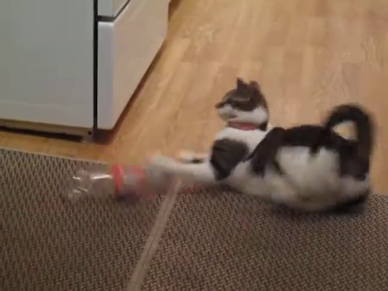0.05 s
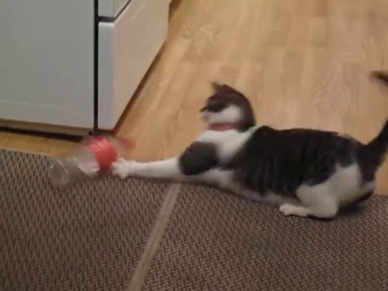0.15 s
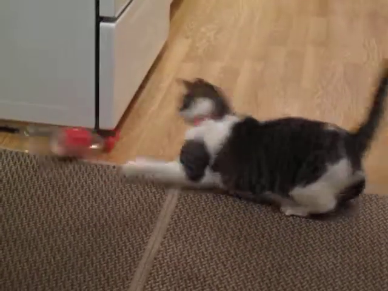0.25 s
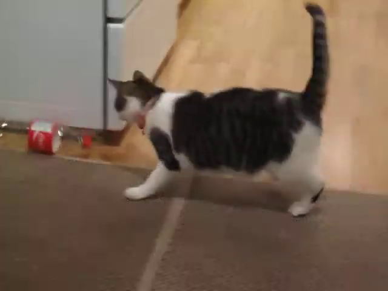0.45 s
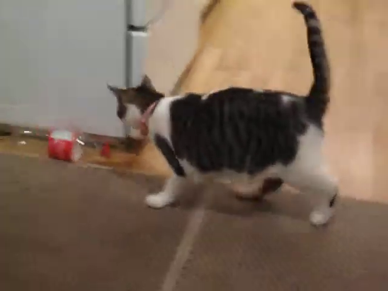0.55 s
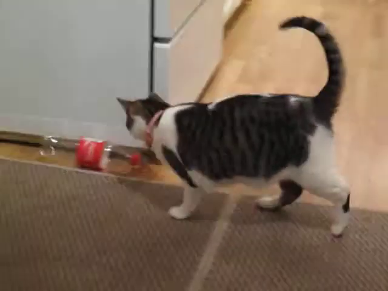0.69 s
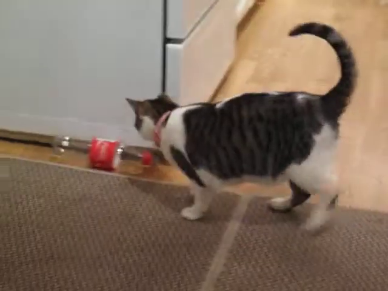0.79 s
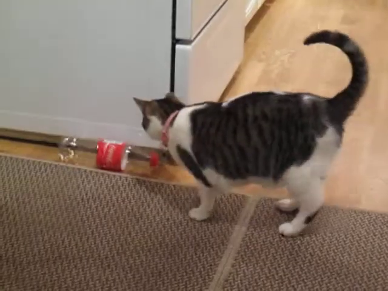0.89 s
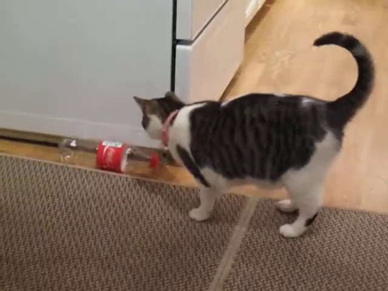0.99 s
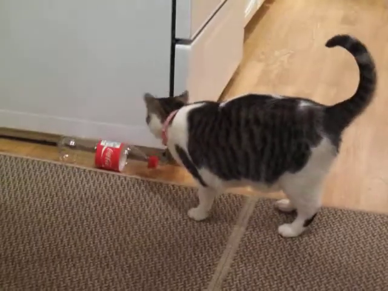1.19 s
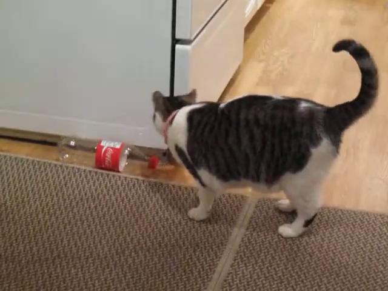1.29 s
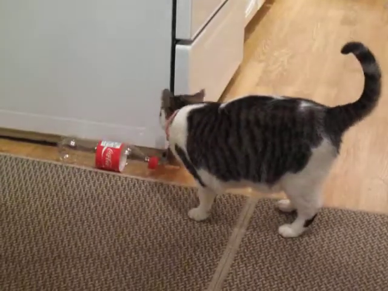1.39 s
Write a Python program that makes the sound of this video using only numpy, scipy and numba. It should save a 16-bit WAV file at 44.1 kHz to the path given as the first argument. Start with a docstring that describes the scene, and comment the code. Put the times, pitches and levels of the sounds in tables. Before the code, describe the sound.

Hollow plastic bottle knocks hard once, skitters and rattles to rest in a small echoing kitchen.

```python
"""Plastic bottle swatted across a kitchen

A cat swats an empty plastic bottle off a rug; it cracks against the fridge, clatters on the hard floor and settles.
Each contact is a noise crackle of the thin wall plus decaying sines for the hollow ring of wall and inner air.
Paws thud as soft noise bursts with booming modes; rubbing gives grainy scuffs and thin wobbling squeaks.
A dense noise tail makes the kitchen reverberate, over the rush, hum and whine of a fridge.
The loudest knock overloads the recorder, whose gain control ducks and then swells the echo back up.
"""
import sys
import numpy as np
from scipy import signal
from scipy.fft import rfft, irfft
from scipy.io import wavfile
from scipy.ndimage import uniform_filter1d
from numba import njit

SR = 44100
rng = np.random.default_rng(int(sys.argv[2]) if len(sys.argv) > 2 else 0)


def put_to_file(sound):
    """Save the sound as 16-bit audio at rate SR, in the file named by the first command-line argument."""
    columns = np.atleast_2d(sound).T  # one column per channel
    safe = np.clip(columns, -1, 1)
    whole_steps = np.round(safe * 32767)
    wavfile.write(sys.argv[1], SR, whole_steps.astype(np.int16))


N = 63945  # length in samples

# Fridge rush, relative spectrum: f/Hz, level/dB
FRIDGE_RUSH_COLOUR = [(15, -52), (25, -20), (108, -5), (145, -12), (185, -2.5), (270, -6), (309, -3.5),
                      (344, -8), (677, -11), (887, -10.5), (1260, -11.5), (1610, -18), (2840, -21),
                      (12200, -33), (16000, -43)]
FRIDGE_RUSH_DB = -50.5  # rms
# Steady fridge tones: f/Hz, rms level/dB
FRIDGE_TONES = [(120, -64), (194, -93), (243, -63), (1529, -68.5), (11770, -79)]
# Narrow noisy fridge whines: f/Hz, width/Hz, rms level/dB
FRIDGE_WHINES = [(2940, 27, -68), (5879, 120, -72), (11780, 120, -82)]

# Kitchen reverberation: f/Hz, t60/s
ROOM_DECAY = [(120, 0.49), (500, 0.51), (1100, 0.4), (3000, 0.43), (7000, 0.42), (14000, 0.41)]
ROOM_DB = 0.5  # tail energy against the direct sound
ROOM_GAP_S, ROOM_BUILD_S = 0.0011, 0.0015

# Scuffs on rug and floor: start t/s, length/s, level/dB
SCUFFS = [(-.04, .13, -43), (0.076, 0.062, -34.5), (0.408, 0.037, -45), (0.622, 0.076, -46)]
# Relative spectrum of a scuff: f/Hz, level/dB
SCUFF_COLOUR = [(100, -7), (350, -10), (700, -1), (1100, -12), (2000, -12), (3800, -5.5), (6000, -8),
                (9000, -28), (16000, -50)]
SCUFF_ROUGH = 0.17
# Thin squeaks of rubbed plastic: start t/s, length/s, f/Hz, peak level/dB
PLASTIC_SQUEAKS = [(0.093, 0.018, 5530, -42), (.141, 0.021, 5490, -34.5), (.498, 0.0026, 4140, -23.5),
                   (.794, 0.0026, 6480, -30)]
SQUEAK_WOBBLE = 0.0073  # rms share of the pitch
# The bottle skitters over the floor after the big knock; tilt in dB/octave
SKITTER_S, SKITTER_LENGTH_S = 0.24, 0.13
SKITTER_DB, SKITTER_TILT_DB, SKITTER_ROUGH = -22, 0.6, 0.68

# Soft thuds of the cat landing on the floor: t/s, level/dB, tilt/(dB/octave)
PAW_THUDS = [(.016, -37.5, -5.5), (.356, -31.5, -6), (.380, -21.5, 6), (.418, -23.5, 1), (.468, -27, -1.5),
             (.535, -29.5, -3.5), (.615, -34, -0.5)]
# Relative spectrum of a paw blow: f/Hz, level/dB
PAW_COLOUR = [(40, -52), (70, -20), (110, -3.5), (300, 3.5), (450, -10.5), (750, -7), (1500, -9),
              (5000, -69)]
# Floor modes before each blow's level and tilt: f/Hz, level/dB, t60/s
FLOOR_RINGS = [(125.6, -17, 0.91), (226, -19.5, 0.88), (249, -11, 0.3), (428, -12, 0.078),
               (563.7, -12, 0.14)]
# Dull bumps of the bottle against the fridge: t/s, level/dB, tilt/(dB/octave)
FRIDGE_BUMPS = [(.717, -26, 2), (.748, -28.5, 1.5), (.803, -36, -6)]
# Relative spectrum of a fridge bump: f/Hz, level/dB
FRIDGE_BUMP_COLOUR = [(40, -40), (110, -8), (200, -8.5), (300, 0), (450, -4), (750, -7), (1500, -26),
                      (5000, -63)]
# Fridge panel modes before each bump's level and tilt: f/Hz, level/dB, t60/s
PANEL_RINGS = [(277, -9.5, 0.25), (373, -16, 0.16), (613, -20.5, 0.41)]
BLOW_ATTACK_S, BLOW_DECAY_S = 0.0032, 0.012  # exponential time constants

# Bottle contacts: t/s, hollow ring level/dB, ring tilt/(dB/octave),
# wall crackle level/dB, crackle tilt/(dB/octave)
CONTACTS = [(0.0122, -43, 20.5, -25.5, 4.5), (0.0309, -39.5, 0, -27.5, 7), (0.0474, -44, 7, -44.5, 0),
            (0.097, -47, 0, -42, -4), (0.1673, -29, 0, -26.5, 6.5), (.1790, -26, -24, -35, 16),
            (.2050, 10, -3, 6.5, 0.1), (.2355, -16, -5, -14, -8), (0.246, 1.5, -13, -16, 7),
            (0.2594, -5, -10, -33, -4), (0.32, -12.5, 9, -16, 0), (0.3541, -17.5, 10, -34, -5),
            (.3790, -21, -22, -18.5, 3), (.3870, -18, -14, -18, -13), (.4085, -22, -2, -20, 5),
            (.4340, -53, 1, -41, -4), (0.4983, -45, 3, -27, -1), (.5720, -36, 5, -28, 3.5),
            (0.5763, -34, 10.5, -26.5, -3.5), (0.582, -40.5, 7, -38.5, 2), (.6030, -32.5, -5, -37, 4),
            (0.635, -46, -12, -36.5, 5), (.6620, -58, -18, -38, -6), (0.7147, -30, 6.5, -29, 10),
            (0.7308, -22, 6.5, -25, -1), (.7395, -31, -23, -31.5, 4), (0.7557, -36, -8, -29, 1),
            (.7890, -42, -17, -24.5, 4), (.7960, -46, 3, -37, 4), (.8170, -30.5, 0, -31, -0.5),
            (0.8616, -40, -12, -44, -7), (.9120, -37.5, -6, -58, 4)]
# Broad wall resonances, then narrow rings of the air inside, before each contact's
# level, tilt and detuning: f/Hz, level/dB, t60/s
BOTTLE_MODES = [(1080, 0, 0.061), (854, -18, 0.032), (1866, -8, 0.056), (2550, -23.5, 0.018),
                (3300, -17.5, 0.015), (4114, -21, 0.014), (998, -25, 0.18), (1116, -34, 0.22),
                (1128, -24.5, 0.34), (1925, -29, .3)]
# Relative spectrum of the wall crackle: f/Hz, level/dB
CRACKLE_COLOUR = [(100, -22), (300, -12), (700, 0.5), (1500, 5), (2800, 3.5), (4500, -4.5), (7500, -11.5),
                  (11000, -24), (13500, -40), (16000, -53)]
CRACK_S, CRINKLE_S = 0.0032, 0.0128  # exponential time constants
CRINKLE_DB, CRINKLE_ROUGH = -13, 0.83  # level against the crack, and its unevenness
DETUNE = 0.0095  # each contact dents the wall and shifts its modes by about this share

# Recorder: threshold, and how fast the gain falls and comes back
LIMIT_DB, DUCK_DB_PER_S, RECOVER_DB_PER_S = -12.5, 4009, 129.5
CLIP_LEVEL, CLIP_KNEE, CLIP_BIAS = 0.7, 6, 0.1  # bias: share by which the negative rail is lower
TOP_HZ = 16100


def amp(db):
    """Turn decibels into a linear gain."""
    return 10 ** (np.asarray(db) / 20)


def unit(x):
    """Scale a signal to rms 1."""
    return x / np.sqrt(np.mean(x ** 2))


def add(out, start_s, sound):
    """Mix a sound in from the given moment."""
    i = int(np.clip(start_s * SR, 0, N - 1))
    out[i:i + len(sound)] += sound[:N - i]


def tint(x, colour, tilt_db):
    """Give a noise a smooth spectrum, tilted in dB per octave, at the same power."""
    octave = np.log2(np.maximum(np.fft.rfftfreq(len(x), 1 / SR), 1))
    hz, db = np.array(colour).T
    gain = amp(np.interp(octave, np.log2(hz), db) + tilt_db * octave)
    phase = np.angle(rfft(x))
    return np.std(x) * unit(irfft(gain * np.exp(1j * phase), len(x)))


def noise(colour, tilt_db=0, size=N):
    """Steady coloured noise of rms 1."""
    return tint(rng.standard_normal(size), colour, tilt_db)


def grain(rough, size=N, count=40):
    """Uneven grip: a random gain that changes about every millisecond."""
    drift = unit(uniform_filter1d(rng.standard_normal(size), count))
    return unit(np.exp(rough * drift))


def swell(start_s, length_s):
    """A rounded rise and fall."""
    progress = np.clip((np.arange(N) / SR - start_s) / length_s, 0, 1)
    return np.sin(np.pi * progress)


def ring(modes, tilt_db, t):
    """Sum of exponentially decaying modes, tilted per octave about the first."""
    total = np.zeros(len(t))
    for hz, db, t60 in modes:
        tilted_db = db + tilt_db * np.log2(hz / modes[0][0])
        total += amp(tilted_db - 60 * t / t60) * np.sin(2 * np.pi * hz * t)
    return total


def fridge():
    """Steady coloured rush with sine tones and faint whines of narrow-band noise."""
    t, f = np.arange(N) / SR, np.fft.rfftfreq(N, 1 / SR)
    out = amp(FRIDGE_RUSH_DB) * noise(FRIDGE_RUSH_COLOUR)
    for hz, db in FRIDGE_TONES:
        out += amp(db) * np.sqrt(2) * np.sin(2 * np.pi * (hz * t + rng.random()))
    for hz, width, db in FRIDGE_WHINES:
        band = np.exp(-((f - hz) / width) ** 2)
        out += amp(db) * unit(irfft(rfft(rng.standard_normal(N)) * band, N))
    return out


def kitchen(x):
    """Direct sound plus a dense noise tail whose decay time depends on frequency."""
    t, f = np.arange(N) / SR, np.fft.rfftfreq(N, 1 / SR)
    hz, t60 = np.array(ROOM_DECAY).T
    white = np.exp(2j * np.pi * rng.random(len(f)))
    tail = np.zeros(N)
    # Overlapping bands share one white noise, each with its own decay
    for share, decay in zip(np.eye(len(hz)), t60):
        band = irfft(white * np.interp(np.log(f + 1), np.log(hz), share), N)
        tail += band * np.exp(-np.log(1000) * t / decay)
    tail *= np.clip((t - ROOM_GAP_S) / ROOM_BUILD_S, 0, 1)
    return x + amp(ROOM_DB) * signal.fftconvolve(x, tail / np.linalg.norm(tail))[:N]


def scuffs():
    """Sliding on rug and floor: coloured noise made grainy by uneven grip."""
    level = sum(amp(db) * swell(start, length) for start, length, db in SCUFFS)
    return level * noise(SCUFF_COLOUR) * grain(SCUFF_ROUGH)


def squeaks():
    """Rubbed plastic: short sines that share a random pitch wobble."""
    wobble = unit(uniform_filter1d(rng.standard_normal(N), size=100))
    turn = 2 * np.pi * np.cumsum(1 + SQUEAK_WOBBLE * wobble) / SR
    return sum(amp(db) * swell(start, length) * np.sin(hz * turn)
               for start, length, hz, db in PLASTIC_SQUEAKS)


def skitter():
    """The bottle skids on the hard floor: a rough swell of wall crackle."""
    level = amp(SKITTER_DB) * swell(SKITTER_S, SKITTER_LENGTH_S)
    return level * noise(CRACKLE_COLOUR, SKITTER_TILT_DB) * grain(SKITTER_ROUGH)


def soft_blows(blows, colour, modes):
    """Soft-edged noise bursts that boom in the modes of the struck surface."""
    out, t = np.zeros(N), np.arange(2 ** 14) / SR
    attack = 1 - np.exp(-t / BLOW_ATTACK_S)
    for start, db, tilt_db in blows:
        burst = np.exp(-t / BLOW_DECAY_S) * noise(colour, tilt_db, size=len(t))
        add(out, start, amp(db) * attack * (burst + ring(modes, tilt_db, t)))
    return out


def paws():
    """The cat lands on the floor in soft thuds that excite the floor modes."""
    return soft_blows(PAW_THUDS, PAW_COLOUR, FLOOR_RINGS)


def fridge_bumps():
    """The bottle bumps dully against the fridge and its panel rings."""
    return soft_blows(FRIDGE_BUMPS, FRIDGE_BUMP_COLOUR, PANEL_RINGS)


def bottle():
    """Each contact cracks and crinkles the wall and rings hollow; the light bottle radiates little bass."""
    out, t = np.zeros(N), np.arange(2 ** 15) / SR
    for start, ring_db, ring_tilt, crack_db, crack_tilt in CONTACTS:
        crinkle = amp(CRINKLE_DB) * np.exp(-t / CRINKLE_S) * grain(CRINKLE_ROUGH, size=len(t))
        shape = np.exp(-t / CRACK_S) + crinkle
        crackle = tint(shape * rng.standard_normal(len(t)), CRACKLE_COLOUR, crack_tilt)
        add(out, start, amp(crack_db) * crackle[:len(t) // 2])
        # Stretching time shifts all modes of this contact together
        dented_t = t * (1 + DETUNE * rng.standard_normal())
        add(out, start, amp(ring_db) * ring(BOTTLE_MODES, ring_tilt, dented_t))
    low_cut_hz = 620
    return signal.sosfilt(signal.butter(3, low_cut_hz, "high", fs=SR, output="sos"), out)


def scene():
    """Bottle, cat and sliding heard through the kitchen, over the fridge."""
    rubbing = scuffs() + skitter() + squeaks()
    events = bottle() + paws() + fridge_bumps() + rubbing
    return (kitchen(events) + fridge())[None]


@njit
def gain_control(x, limit, duck, recover):
    """The gain falls fast while the output is over the limit and creeps back to 1."""
    y, gain = np.empty(len(x)), 1.
    for i in range(len(x)):
        y[i] = x[i] * gain
        gain = gain * duck if abs(y[i]) > limit else min(1., gain * recover)
    return y


def record(dry):
    """Gain control, rounded and lopsided clipping of what it is too slow to catch, and the top cut."""
    duck = float(amp(-DUCK_DB_PER_S / SR))  # gain step per sample
    recover = float(amp(RECOVER_DB_PER_S / SR))
    held = gain_control(dry[0], float(amp(LIMIT_DB)), duck, recover)
    rail = np.where(held < 0, CLIP_LEVEL * (1 - CLIP_BIAS), CLIP_LEVEL)
    clipped = held / (1 + np.abs(held / rail) ** CLIP_KNEE) ** (1 / CLIP_KNEE)
    top_cut = signal.firwin(301, TOP_HZ, fs=SR, window="blackmanharris")
    return signal.fftconvolve(clipped, top_cut, "same")[None]


dry = scene()
out = record(dry)
put_to_file(out)
```